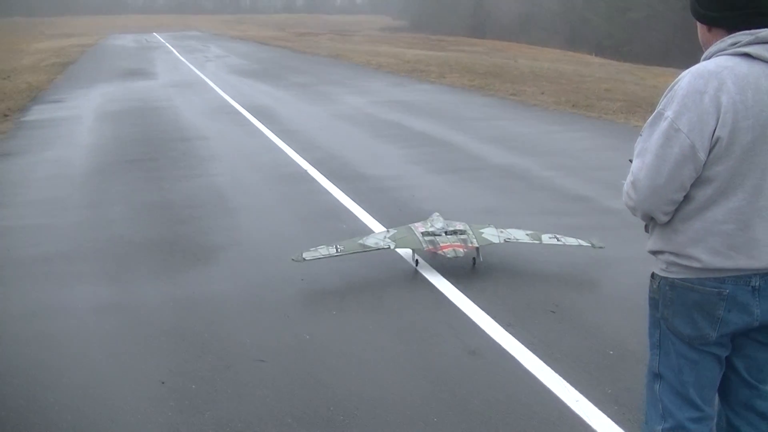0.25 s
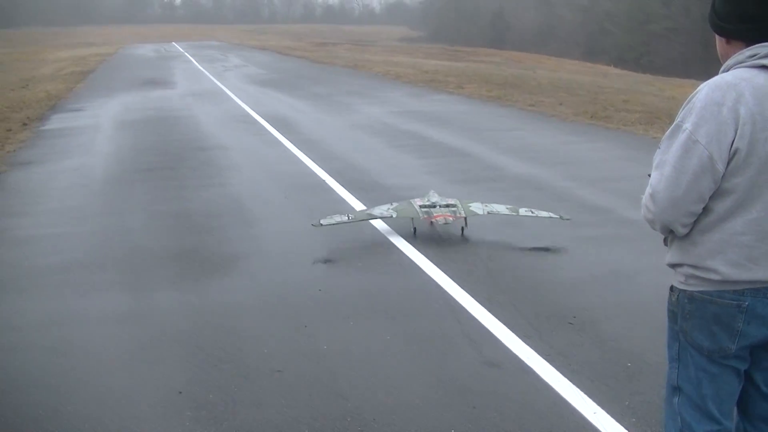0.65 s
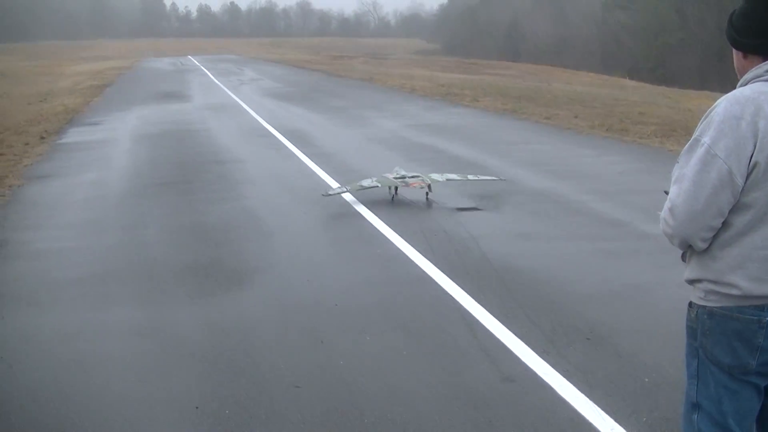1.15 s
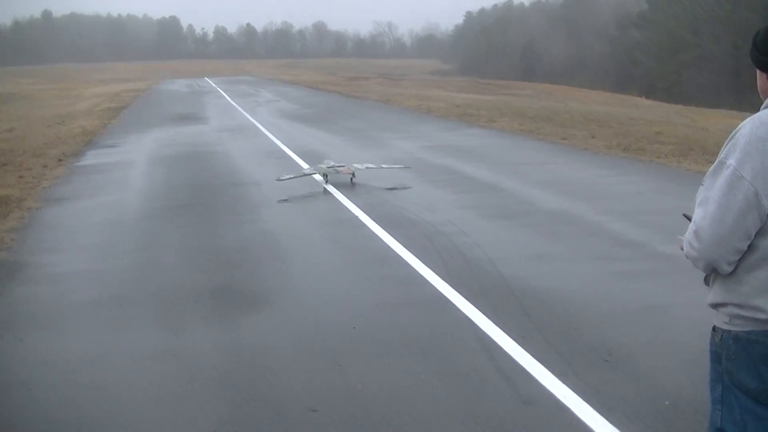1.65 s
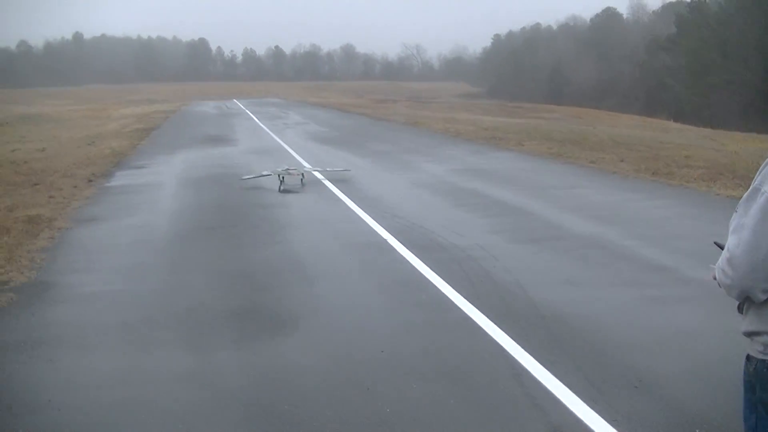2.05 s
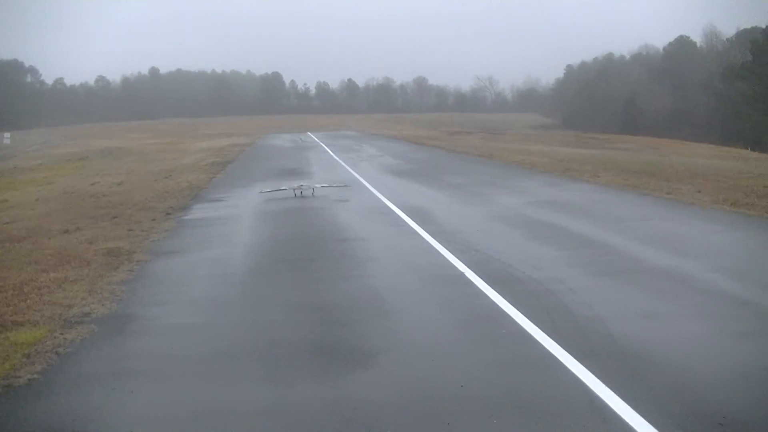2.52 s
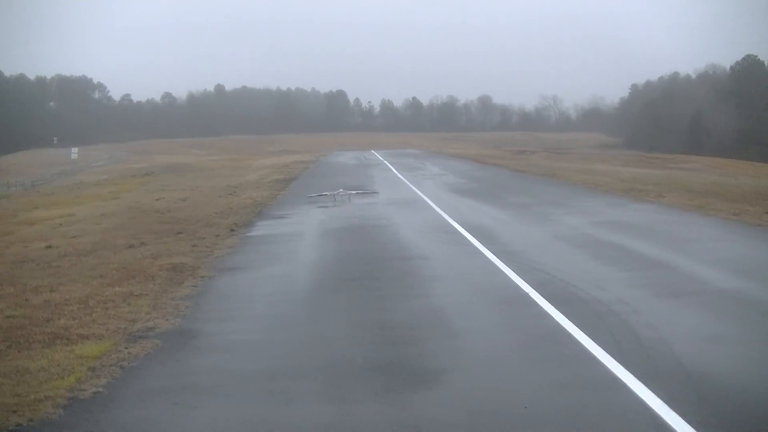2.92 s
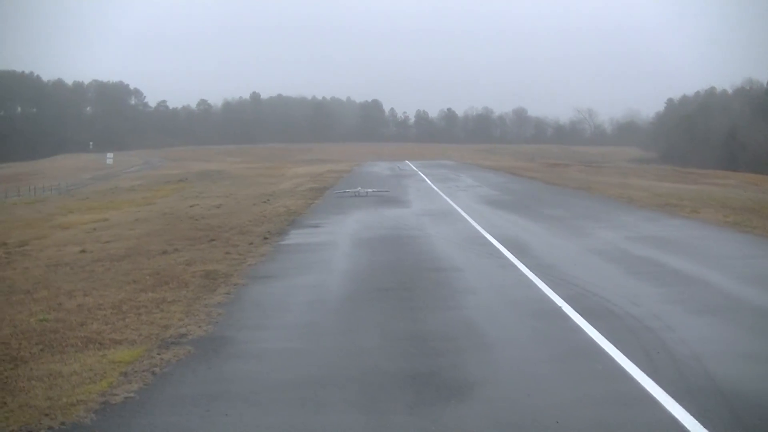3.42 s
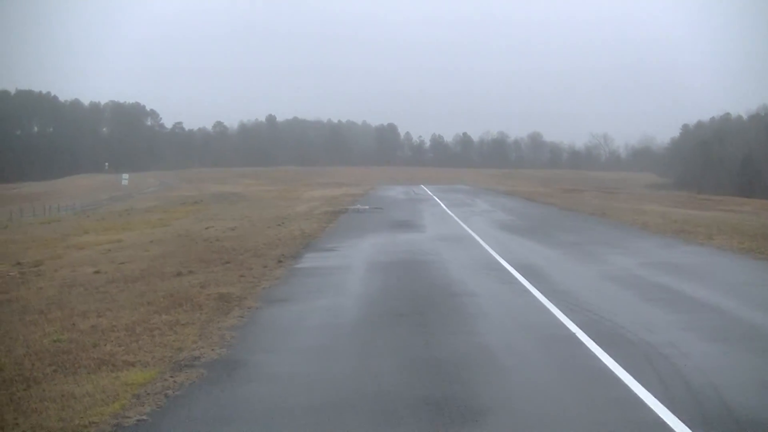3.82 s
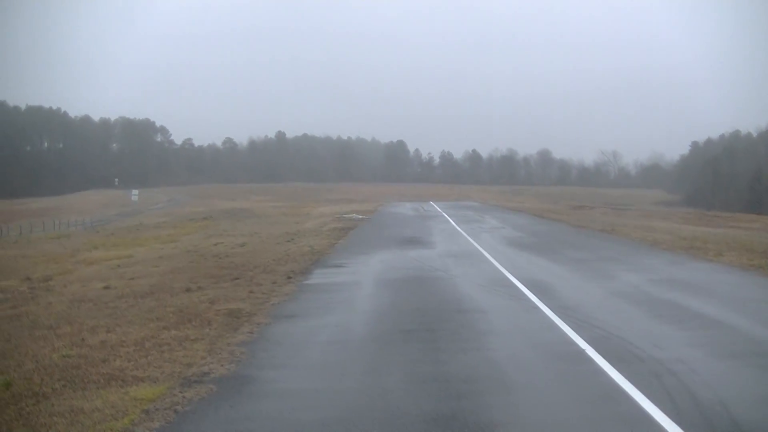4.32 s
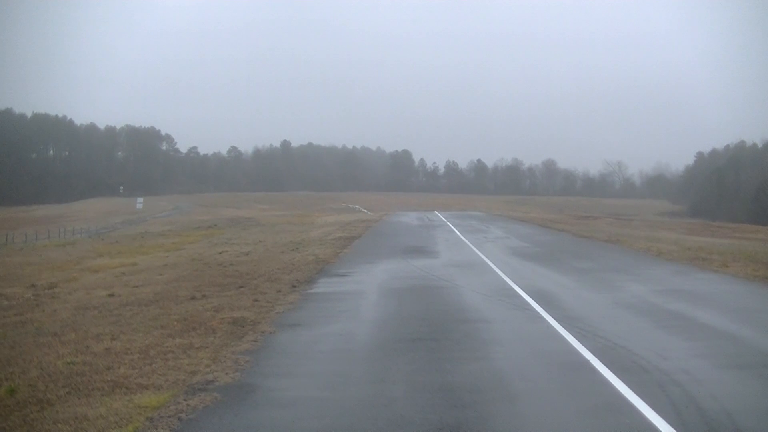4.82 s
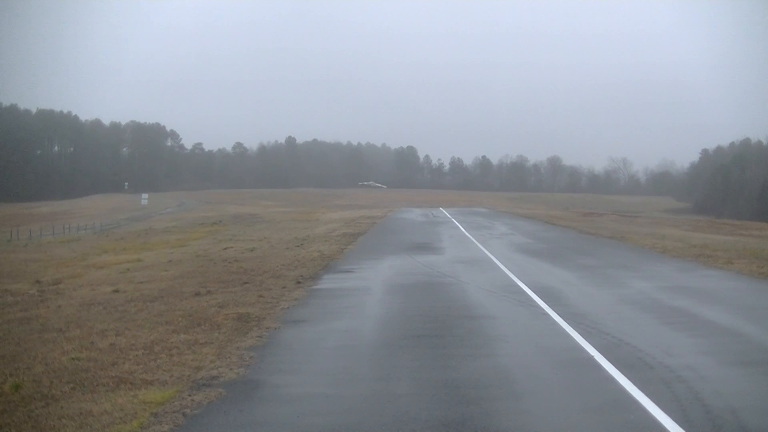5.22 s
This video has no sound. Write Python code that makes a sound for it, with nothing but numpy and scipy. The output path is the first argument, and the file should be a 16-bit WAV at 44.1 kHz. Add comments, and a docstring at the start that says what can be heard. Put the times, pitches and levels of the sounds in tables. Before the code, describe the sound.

An electric model aircraft's propeller whines up in pitch as it takes off and flies away, with one sharp crack near the end.

```python
"""The two-blade pusher propeller of an electric model aircraft cuts the wing's wakes four times a turn:
a whine of shaft orders over a pulsing wash. The aircraft takes off from a paved strip, with a howl of
stalled air, a thin controller tone and wheel rumble, and flies away over faintly hushing fields.
Late on the propeller clips something with a sharp crack, loses speed and spins up again."""
import sys
import numpy as np
from scipy.fft import rfft, irfft, next_fast_len
from scipy.io import wavfile
from scipy.ndimage import map_coordinates

SR = 44100
rng = np.random.default_rng(int(sys.argv[2]) if len(sys.argv) > 2 else 0)


def to_wav(s):
    """Save 16-bit WAV."""
    ch = np.atleast_2d(s).T  # columns
    pcm = np.round(np.clip(ch, -1, 1) * 32767)  # PCM
    wavfile.write(sys.argv[1], SR, pcm.astype(np.int16))


N = 240913

# Spectra of still air and wheel rumble. Each row: frequency in Hz, level in dB.
FIELD_SPECTRUM = [(20, -21), (50, -6), (80, -8), (130, -0.5), (300, 0), (500, 4.5), (1000, 5.5),
                  (4000, -51), (15000, -45)]
TYRE_SPECTRUM = [(40, -33), (150, -14), (350, -12), (550, 4), (800, 0), (1500, -40), (15000, -99)]

# Flight. Each row: time in seconds, side shown (0 rolling, 1 lifting, 2 tail-on), remoteness 0-1.
FLIGHT_PATH = [(0, 0, 0.06), (.35, -0.07, 0.0011), (.62, 0.12, 0.048), (.8, 0.84, 0.0092), (1.35, 1.74, 0),
               (1.7, 2.17, 0.025), (2.15, 2, 0.043), (2.6, 2.2, 0.48), (3.1, 3, 0.77), (5.46, 1.4, 0.99)]
# Throttle. Each row: start in seconds, length in seconds, shaft speed change in Hz.
THROTTLE_MOVES = [(-.07, .23, 5.6), (.686, .124, 17.3), (.865, .144, -12.7), (1.061, .214, 31.4),
                  (1.295, .144, -4.2), (1.375, .168, 14.25)]
# Ground reflection. Each row: time in seconds, notch in Hz, echo gain.
GROUND_NOTCH = [(2.4, 2800, 0), (3.6, 2690, 0.4), (4.3, 2400, 0), (4.6, 1870, 0.47), (4.85, 1450, .5),
                (5.25, 1220, 0.46)]
# Brief dips in the low climb. Each row: centre and half-width in seconds, whine and hiss drops in dB.
LEVEL_DIPS = [(1.909, 0.017, 11.5, 6), (2.154, 0.056, 4, 0), (2.282, 0.012, 7, 1), (2.366, 0.011, 12, 4)]
# Stereo balance. Each row: frequency in Hz, left minus right in dB.
PAN_LEVEL = [(100, .5), (300, 1), (700, 1.2), (960, 2.2), (1200, 5), (2000, 6.5), (5000, 6), (8000, 3.8),
             (13000, 3.4)]
# Stereo phase. Each row: frequency in Hz, left lead in radians.
PAN_PHASE = [(100, -0.37), (1000, 0.29), (3100, 0.57), (3700, 0.74), (4300, 1), (6500, -0.4), (8400, 0.99),
             (15000, -0.0054)]

# Propeller strike. Each row: start in seconds, level in dB, high-pass and low-pass corners in Hz.
STRIKE_BLOWS = [(5.2629, -17.5, 2800, 7000), (5.2654, -13.2, 200, 3800), (5.2725, -28, 200, 700),
                (5.2785, -32, 200, 500)]
# Blade and airframe resonances. Each row: frequency in Hz, width in Hz, gain in dB.
AIRFRAME_MODES = [(330, 350, -11), (720, 45, 0), (860, 60, 2), (1050, 200, -7), (1560, 380, -1),
                  (2370, 330, 4.5), (3300, 200, -1), (4900, 800, -10), (6100, 550, -2), (9800, 1500, -21)]

# Wash bands. Each row: frequency in Hz, then rolling, tail-on and remote levels in dB.
BODY_SPECTRA = [(150, -39, -31, -23), (380, -39, -18.5, -26), (554, -16.5, -6, -5.5), (867, -3, -4.5, -2),
                (1120, -7, 1.5, -1.5), (1206, -8.5, -4.5, -0.5), (1495, -1.5, 4, 4.5), (1756, -4.5, -5, -3),
                (1953, 3, 3.5, 6.5), (2600, 0, 1, 3.5), (2800, 1.5, -1.5, -2), (3517, 2.5, -7, -5.5),
                (4030, -44, -41, -39)]
HISS_SPECTRA = [(3270, -55, -57, -55), (3720, 1, -6, -1), (3940, 6.5, 0, 4.5), (4250, 4, -1.5, 2.5),
                (4620, 5.5, 8, 11), (4940, 6, 7, 7.5), (5460, 8.5, 5, 5), (6000, 8.5, 9.5, 5),
                (6730, 0, -2, -5), (7430, -9, -2.5, -10), (7750, -9, -17, -20), (8100, -54, -60, -99)]
FIZZ_SPECTRA = [(6350, -41, -11.5, -9), (8200, -2, 2.5, 3.5), (8750, 4.5, 4, 6.5), (10060, -7.5, -0.5, 1),
                (10600, 3.5, 5.5, 4.5), (11830, 2.5, 0, -1), (13000, -9, -2.5, -9), (14300, -7, -2, -4),
                (15800, -15, -15, -22)]
# Wash envelopes, 4-7 kHz and above 8 kHz. Each row: time in seconds, level in dB.
HISS_ENVELOPE = [(0, -26.5), (1.12, -28.5), (1.29, -24.5), (1.55, -28), (2, -27.5), (2.16, -31.5),
                 (2.6, -31), (2.8, -36.5), (3.06, -41.5), (3.49, -48), (3.7, -43), (4.05, -39),
                 (4.24, -44.5), (4.35, -37.5), (4.47, -44.5), (4.73, -43.5), (4.95, -32.5), (5.1, -32.5),
                 (5.23, -46), (5.35, -36), (5.46, -37.5)]
FIZZ_ENVELOPE = [(0, -35.5), (.8, -33.5), (1.03, -40), (1.3, -37.5), (1.6, -41), (2.08, -39), (2.22, -37),
                 (2.45, -34.5), (2.56, -41), (2.72, -49), (3.05, -60), (3.5, -62), (3.72, -56), (4.05, -54),
                 (4.5, -61.5), (4.75, -60), (4.97, -53.5), (5.2, -58), (5.46, -60)]

# Middle and high orders. Each row: shaft order, then rolling, lifting and tail-on gains in dB.
OVERTONE_ORDERS = [(3, -26, -18.5, -36), (5, -42, -13, -41), (6, -27, -14.5, -13.5), (7, -39, -14, -42),
                   (10, -14.5, -8, -5.5), (11, -14, -22, -14), (13, -4, -14, -24), (14, -6.5, -7, -12.5),
                   (15, -10.5, -12, -30)]
RASP_ORDERS = [(20, -9, -2.5, -8.5), (22, -13, -16, -24), (24, -9, -6, -5), (26, -8, -13, -28),
               (28, -5, -12, -18), (30, -12, -24, -24), (32, -14, -36, -25), (36, -24, -31, -29),
               (40, -21, -30, -32), (42, -19, -35, -35), (44, -19, -31, -23), (48, -26, -29, -33)]
# Ragged inflow at lift-off. Each row: centre and half-width in seconds, rasp rise in dB.
RASP_SURGES = [(1.171, 0.0077, 10.5), (1.239, 0.0091, 7), (1.295, 0.01, 7.5), (1.37, 0.011, 5.5),
               (1.433, 0.0089, 8)]
# Rough whistles. Each row: centre and half-width in seconds, multiple of shaft speed, level in dB.
LIFTOFF_WHISTLES = [(.9, 0.088, 18.8, -35), (0.986, 0.037, 19.55, -27), (1.13, 0.051, 14.8, -31)]
# Envelopes of shaft orders 4, 8, 12 and 16. Each row: time in seconds, level in dB.
WAKE_CUT_ENVELOPE = [(0, -32.5), (.32, -40), (.66, -51), (.73, -36.5), (.79, -24), (.89, -25),
                     (1.04, -36.5), (1.17, -27), (1.3, -33.5), (1.85, -36.5), (2.12, -46), (2.6, -37),
                     (3.3, -40), (4.5, -39), (4.72, -43.5), (5.2, -38)]
WHINE_ENVELOPE = [(0, -35), (.33, -36.5), (.56, -43), (.99, -34.5), (1.14, -35.5), (1.38, -29.5),
                  (1.47, -26), (1.63, -25), (1.85, -21), (2.5, -20.5), (2.77, -24), (2.85, -27),
                  (3.07, -31), (3.29, -31), (3.54, -35.5), (3.75, -35), (3.95, -30), (4.15, -32),
                  (4.3, -38.5), (4.47, -42), (4.83, -38), (4.96, -33), (5.46, -33.5)]
FIFTH_ENVELOPE = [(0, -35), (.65, -45), (1, -35.5), (1.2, -38.5), (1.45, -34), (2.1, -37), (2.75, -31.5),
                  (2.85, -36.5), (3.05, -38), (3.5, -50.5), (4.05, -42), (4.45, -49), (5.15, -40.5),
                  (5.46, -50)]
OCTAVE_ENVELOPE = [(0, -48), (.85, -53), (1, -41), (1.6, -43), (1.9, -31.5), (2.3, -31), (2.75, -31.5),
                   (2.85, -39), (3.45, -53), (4, -48), (4.7, -55), (4.95, -45), (5.3, -47)]

SHAFT_HZ, STANDSTILL_END_S = 202, 0.66
GETAWAY_S, DOPPLER_DROP, DOPPLER_LAG_S = 1.66, 0.0364, 1.53
STALL_HZ, STALL_DB, BRAKE_S, RECOVER_S = 15.5, 4.5, 0.017, 0.06
SWITCH_HZ, SWITCH_DB, SWITCH_FADE_DB_PER_S = 7940, -47, 18
SCRAPE_GAIN, SCRAPE_DECAY_S, BLOW_S = 0.6, 0.0018, 0.003
RATTLE_DB, RATTLE_HZ, RATTLE_WIDTH_HZ, RATTLE_T60_S = -25, 790, 560, 0.036
HUM_DB, HUM_DB_PER_HZ, HUM_FADE_DB_PER_S = -53.5, 0.2075, 7
OVERTONE_DB, OVERTONE_FAR_LOSS_DB, STANDSTILL_BOOST_DB = -31, 6.5, 7.5
SHRIEK_ORDER, SHRIEK_BOOST_DB = 14, 6.5
BODY_DB, BODY_FAR_LOSS_DB, WHINE_MID_DB = -30.5, 8, -32
TOP_HZ = 15850


def amp(db):
    """Decibels to gain."""
    return 10 ** (np.asarray(db) / 20)


def unit(x):
    """Scale to rms 1."""
    return x / np.sqrt(np.mean(np.abs(x) ** 2) + 1e-20)


def along(table, hz, column=1):
    """One column of a frequency table, read on a log axis."""
    columns = np.transpose(table)
    return np.interp(np.log(hz + 1), np.log(columns[0] + 1), columns[column])


def curves(table):
    """Per-sample curve for each column after the time."""
    times_s, *columns = np.transpose(table)
    return [np.interp(np.arange(N) / SR, times_s, column) for column in columns]


def bump(centre_s, half_width_s):
    """Bell curve of height 1."""
    return np.exp(-((np.arange(N) / SR - centre_s) / half_width_s) ** 2)


def since(start_s):
    """Seconds after the start, zero before."""
    return np.maximum(np.arange(N) / SR - start_s, 0)


def wobble(rate_hz):
    """Smooth random curve of rms 1, with knots at rate_hz."""
    coarse = np.linspace(0, N, 8192)
    knots = rng.standard_normal(int(N * rate_hz / SR) + 4)
    smooth = map_coordinates(knots, [coarse * rate_hz / SR])
    return unit(np.interp(np.arange(N), coarse, smooth))


def filtered(x, response):
    """Apply a response given as a function of Hz."""
    size = next_fast_len(N + 8192)
    return irfft(rfft(x, size) * response(np.fft.rfftfreq(size, 1 / SR)), size)[..., :N]


def highpass(hz, corner_hz):
    """One-pole high-pass response."""
    return 1j * hz / (corner_hz + 1j * hz)


def resonance(hz, centre_hz, width_hz):
    """Response of one damped mode."""
    return 1j * hz * width_hz / (centre_hz ** 2 - hz ** 2 + 1j * hz * width_hz)


def tone(angle, order, smear_rad):
    """One order; eddies shake its phase and strength, faster at higher orders."""
    rate_hz = 14 + 0.9 * order
    eddies = unit(wobble(rate_hz) + (0.2 + 0.03 * order) * wobble(6 * rate_hz))
    strength = 1 + np.minimum(smear_rad, 0.25) * wobble(2 * rate_hz)
    phase = order * angle + smear_rad * eddies + rng.uniform(0, 2 * np.pi)
    return np.sqrt(2) * strength * np.cos(phase)


def skirt(angle, order, width_hz):
    """Narrow noise of rms 1 tracking a shaft order."""
    baseband = wobble(width_hz) + 1j * wobble(width_hz)
    return unit((baseband * np.exp(1j * order * angle)).real)


def facing(levels_db, side):
    """Gain of an order, blended between the sides shown."""
    return sum(amp(db) * np.clip(1 - np.abs(side - k), 0, 1) for k, db in enumerate(levels_db))


def field():
    """Faint low hush of open country."""
    pair = rng.standard_normal(N) + 0.3 * rng.standard_normal((2, N))
    return amp(-53.5) * unit(filtered(pair, lambda hz: amp(along(FIELD_SPECTRUM, hz))))


def standing():
    """1 at standstill, 0 once rolling smooths the inflow."""
    return np.cos(np.pi / 2 * np.minimum(since(0) / STANDSTILL_END_S, 1)) ** 2


def ground_run(angle):
    """Stalled air howls at the blades, the speed controller sings, wheels rumble on pavement."""
    howl = amp(-31) * standing() * skirt(angle, order=13, width_hz=800)
    t = since(0)
    switching = tone(2 * np.pi * SWITCH_HZ * t, order=1, smear_rad=0.25)
    switching *= amp(SWITCH_DB - SWITCH_FADE_DB_PER_S * t)
    rumble = unit(filtered(rng.standard_normal(N), lambda hz: amp(along(TYRE_SPECTRUM, hz))))
    return howl + switching + amp(-52) * bump(centre_s=0.85, half_width_s=0.23) * rumble


def strike():
    """A blade tick, a heavy blow and two dull bounces, each with a scrape, ring the airframe."""
    out = np.zeros(N)
    t = np.arange(4096) / SR
    hz = np.fft.rfftfreq(len(t), 1 / SR)
    airframe = sum((-1) ** k * amp(db) * resonance(hz, centre_hz, width_hz)
                   for k, (centre_hz, width_hz, db) in enumerate(AIRFRAME_MODES))
    for start_s, db, low_hz, high_hz in STRIKE_BLOWS:
        scrape = rng.standard_normal(len(t)) * np.exp(-t / SCRAPE_DECAY_S)
        force = (t == 0) + SCRAPE_GAIN * scrape / np.linalg.norm(scrape)
        band = highpass(hz, low_hz) * highpass(hz, 130) / (1 + 1j * hz / high_hz)
        crack = irfft(rfft(force) * airframe * band)
        crack *= np.sqrt(BLOW_S * SR) / np.linalg.norm(crack)
        out[round(start_s * SR):][:len(t)] += amp(db) * crack
    return out


def rattle():
    """Dull panel rattle after the second blow."""
    age_s = since(STRIKE_BLOWS[1][0])
    shaking = rng.standard_normal(N) * (age_s > 0) * amp(-60 * age_s / RATTLE_T60_S)
    panel = lambda hz: resonance(hz, RATTLE_HZ, RATTLE_WIDTH_HZ) * highpass(hz, 130) ** 2
    return amp(RATTLE_DB) * filtered(shaking, panel) * np.sqrt(SR / (np.pi * RATTLE_WIDTH_HZ))


def stall():
    """Depth 0-1: the strike brakes the shaft, the motor pulls it back up."""
    age_s = since(STRIKE_BLOWS[0][0])
    return np.minimum(age_s / BRAKE_S, 1) * np.exp(-np.maximum(age_s - BRAKE_S, 0) / RECOVER_S)


def shaft_speed_hz():
    """Shaft speed as heard: stall, S-shaped throttle moves, Doppler drop in the getaway."""
    speed_hz = SHAFT_HZ - STALL_HZ * stall()
    for start_s, length_s, change_hz in THROTTLE_MOVES:
        progress = np.minimum(since(start_s) / length_s, 1)
        speed_hz += change_hz * progress ** 2 * (3 - 2 * progress)
    receding = 1 - np.exp(-since(GETAWAY_S) / DOPPLER_LAG_S)
    return speed_hz * (1 - DOPPLER_DROP * receding)


def buffet(side, remote):
    """Propeller gain as gusts load the blades; deepest in the low climb."""
    depth_db = 0.45 + 0.4 * side * (1 - 0.6 * remote)
    return amp(depth_db * wobble(60))


def ground_bounce(pair):
    """A delayed copy off the ground sweeps a notch downward."""
    notch_hz, gain = curves(GROUND_NOTCH)
    n = np.arange(N)
    echo = np.array([np.interp(n - SR / (2 * notch_hz), n, channel) for channel in pair])
    return (pair + gain * echo) / np.sqrt(1 + gain ** 2)


def chopped_air(speed_hz, likeness):
    """Successive cuts meet the same eddy: noise that recurs at quarter turns."""
    noise = rng.standard_normal(N)
    quarter_turn_samples = SR / (4 * speed_hz)
    for k in (1, 2):
        noise += likeness ** k * map_coordinates(noise, [np.arange(N) - k * quarter_turn_samples])
    return unit(noise)


def wash_levels_db(remote):
    """Body, hiss and fizz levels; the body follows the whine, more so far off."""
    swing_db = curves(WHINE_ENVELOPE)[0] - WHINE_MID_DB
    stall_db = 0.5 * STALL_DB * stall()
    dip_db = sum(db * bump(s, width_s) for s, width_s, _, db in LEVEL_DIPS)
    body_db = BODY_DB - BODY_FAR_LOSS_DB * remote + (0.19 + 0.2 * remote) * swing_db - dip_db / 2
    hiss_db = curves(HISS_ENVELOPE)[0] - dip_db
    fizz_db = curves(FIZZ_ENVELOPE)[0]
    return body_db - stall_db, hiss_db - stall_db, fizz_db - stall_db


def propeller_wash(angle, speed_hz, side, remote):
    """Blade turbulence, a burst at every wake; every other burst is stronger."""
    body_db, hiss_db, fizz_db = wash_levels_db(remote)
    tail_on = np.clip(side / 2, 0, 1)
    bursts_db = (4.2 - tail_on) * np.cos(4 * angle) + (3.2 - 0.78 * tail_on) * np.cos(2 * angle)
    flutter_db = 0.98 * wobble(500) + 0.5 * wobble(110)
    air = chopped_air(speed_hz, likeness=0.27 + 0.069 * remote)

    def band(spectra, depth, spread):
        """Stereo band; its colour shifts as the aircraft turns tail-on and recedes."""
        def colours(hz):
            inside = (hz > spectra[0][0] / 2) & (hz < spectra[-1][0])
            return np.array([[inside * amp(along(spectra, hz, column))] for column in (1, 2, 3)])

        pair = air + spread * rng.standard_normal(N) * np.array([[1], [-1]])
        pair *= amp(depth * (bursts_db + flutter_db))
        near, away, far = map(unit, filtered(pair, colours))
        return (1 - tail_on) * near + tail_on * ((1 - remote) * away + remote * far)

    body = amp(body_db) * ground_bounce(band(BODY_SPECTRA, depth=0.62, spread=0.12))
    hiss = amp(hiss_db) * band(HISS_SPECTRA, depth=1.6, spread=0.17)
    fizz = amp(fizz_db) * band(FIZZ_SPECTRA, depth=0.99, spread=0.3)
    return body + hiss + fizz


def propeller_rasp(angle, side, remote):
    """High orders ride on the hiss, burst in ragged inflow and blur with distance."""
    hiss_db = wash_levels_db(remote)[1]
    surge_db = sum(db * bump(s, width_s) for s, width_s, db in RASP_SURGES)
    ragged_db = 2.5 * np.clip(1.3 - np.abs(side - 1.1), 0, 1) * wobble(70)
    gain = amp(hiss_db + surge_db + ragged_db - 10 * remote)
    lifting = np.clip(np.minimum(side, 4 * (1.6 - side)), 0, 1)
    smear_rad = 0.2 + 0.45 * lifting + remote
    return gain * sum(facing(levels_db, side) * tone(angle, order, smear_rad)
                      for order, *levels_db in RASP_ORDERS)


def whistles(angle):
    """Brief rough whistles at lift-off, tied to shaft speed."""
    return sum(amp(db) * bump(s, width_s) * tone(angle, order, smear_rad=0.81)
               for s, width_s, order, db in LIFTOFF_WHISTLES)


def overtones(angle, side, remote):
    """Middle orders: raised by ragged inflow at standstill, fading with the whine far off."""
    swing_db = curves(WHINE_ENVELOPE)[0] - WHINE_MID_DB
    level_db = OVERTONE_DB + STANDSTILL_BOOST_DB * standing() - STALL_DB * stall()
    level_db += remote * (0.66 * swing_db - OVERTONE_FAR_LOSS_DB)
    out = np.zeros(N)
    for order, *levels_db in OVERTONE_ORDERS:
        scatter = remote * (order / OVERTONE_ORDERS[-1][0]) ** 2  # short waves blur first
        shriek_db = SHRIEK_BOOST_DB * standing() * (order == SHRIEK_ORDER)
        gain = amp(level_db + shriek_db - 10 * scatter) * facing(levels_db, side)
        out += gain * tone(angle, order, smear_rad=0.21 + 1.1 * scatter)
    return out


def whine(angle, remote):
    """Order 8, its fifth and octave; ragged inflow adds noise skirts, most in far swells."""
    stall_db = STALL_DB * stall()
    dip_db = sum(db * bump(s, width_s) for s, width_s, db, _ in LEVEL_DIPS)
    whine_db = curves(WHINE_ENVELOPE)[0] - dip_db - stall_db
    fifth_db = curves(FIFTH_ENVELOPE)[0] - stall_db
    octave_db = curves(OCTAVE_ENVELOPE)[0] - stall_db
    skirt_db = -14.5 + remote * (7 + 0.27 * (whine_db - WHINE_MID_DB))
    out = amp(whine_db) * tone(angle, order=8, smear_rad=0.05 + 0.03 * remote)
    out += amp(fifth_db) * tone(angle, order=12, smear_rad=0.15 + 0.1 * remote)
    out += amp(octave_db) * tone(angle, order=16, smear_rad=0.12 + 0.85 * remote ** 4)
    out += amp(whine_db + skirt_db) * skirt(angle, order=8.3, width_hz=270)
    out += amp(fifth_db + skirt_db + 3) * skirt(angle, order=11.9, width_hz=260)
    return out + amp(octave_db - 7 + 8 * remote) * skirt(angle, order=16.25, width_hz=260)


def propeller_tones(angle, speed_hz, side, remote):
    """Unbalance hum, whine, blade and wake-cutting tones, overtones, whistles: all track the shaft."""
    hum_db = HUM_DB + HUM_DB_PER_HZ * (speed_hz - SHAFT_HZ) - HUM_FADE_DB_PER_S * since(GETAWAY_S)
    blade_db = -67 + 13.6 * np.minimum(side, 1) - 8.1 * remote
    wake_cut_db = curves(WAKE_CUT_ENVELOPE)[0] - 2 * STALL_DB * stall()
    out = amp(hum_db) * tone(angle, order=1, smear_rad=0.04) + whine(angle, remote)
    out += amp(blade_db) * tone(angle, order=2, smear_rad=0.19)
    out += amp(wake_cut_db) * tone(angle, order=4, smear_rad=0.06)
    return out + overtones(angle, side, remote) + whistles(angle)


def scene():
    """Aircraft left of centre, mostly above the bass, over the field's hush."""
    speed_hz = shaft_speed_hz()
    side, remote = curves(FLIGHT_PATH)
    angle = 2 * np.pi * np.cumsum(speed_hz * (1 + 0.0004 * wobble(25))) / SR
    tones = propeller_tones(angle, speed_hz, side, remote) + propeller_rasp(angle, side, remote)
    propeller = buffet(side, remote) * (tones + propeller_wash(angle, speed_hz, side, remote))
    aircraft = propeller + ground_run(angle) + strike() + rattle()
    left = lambda hz: 2 / (1 + amp(-along(PAN_LEVEL, hz)) * np.exp(-1j * along(PAN_PHASE, hz)))
    return filtered(aircraft, lambda hz: np.array([left(hz), 2 - left(hz)])) + field()


def record(dry):
    """Brick-wall low-pass at TOP_HZ."""
    return filtered(dry, lambda hz: hz < TOP_HZ)


dry = scene()
out = record(dry)
to_wav(out)
```